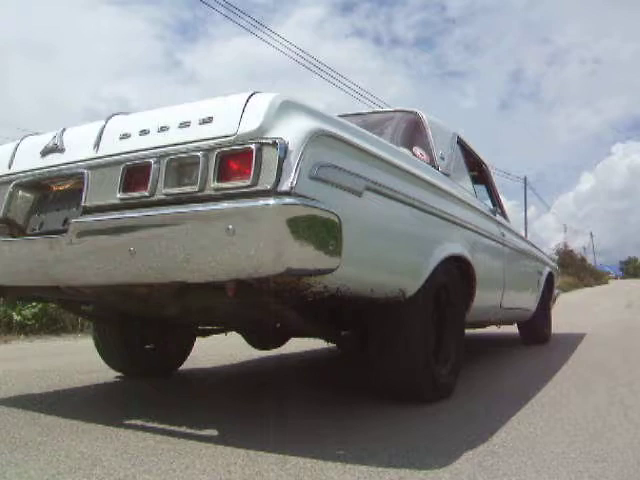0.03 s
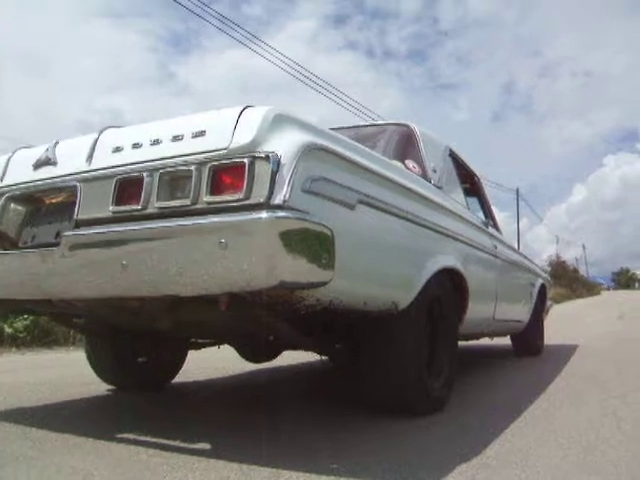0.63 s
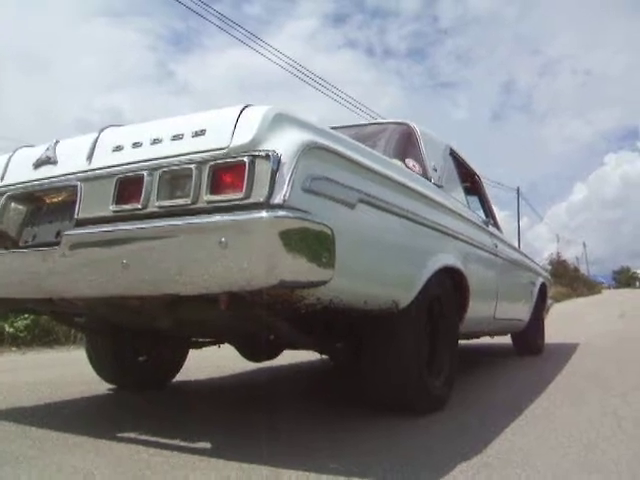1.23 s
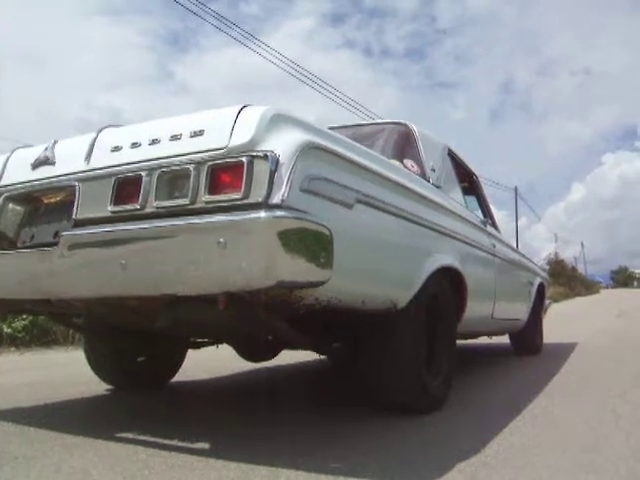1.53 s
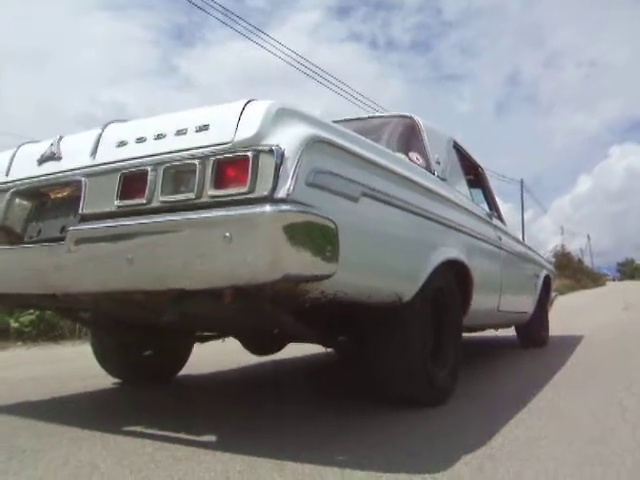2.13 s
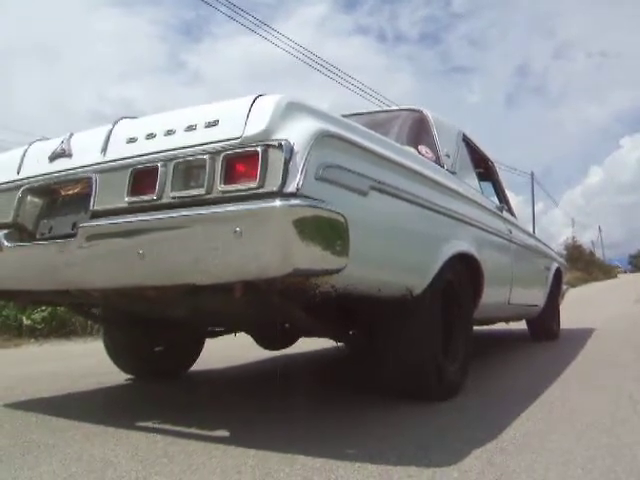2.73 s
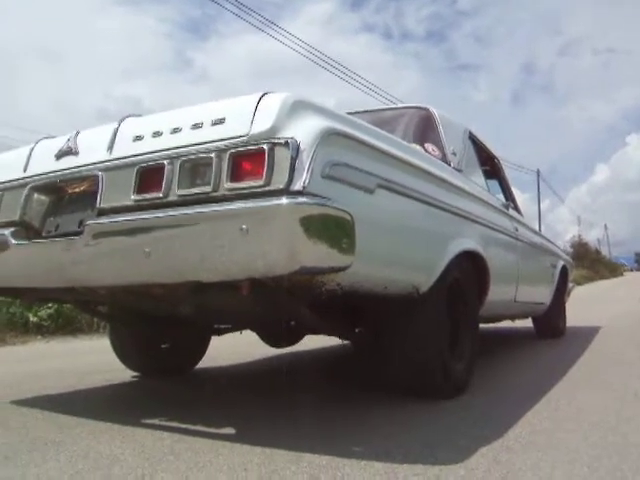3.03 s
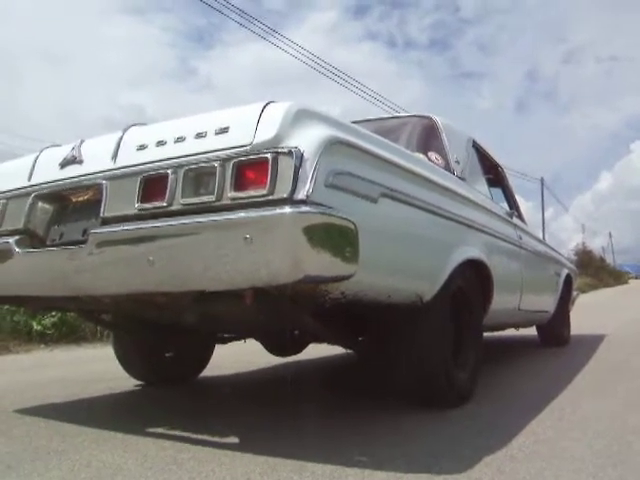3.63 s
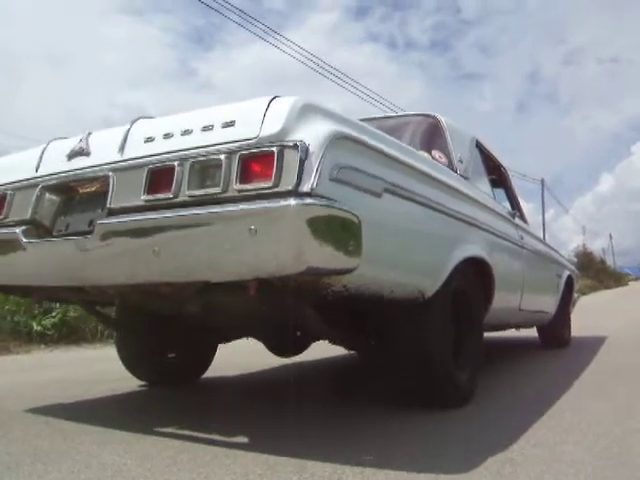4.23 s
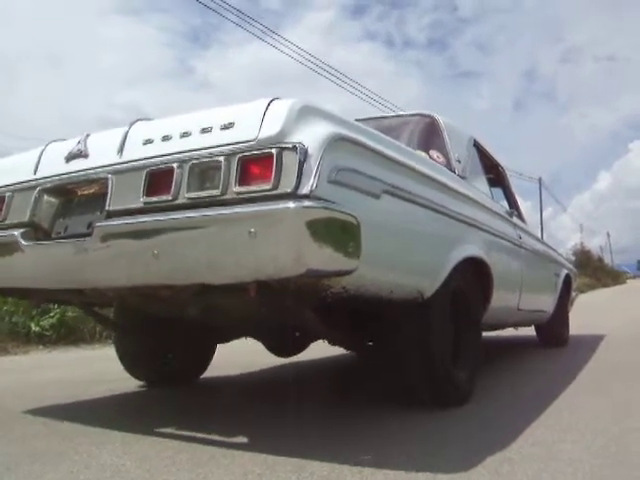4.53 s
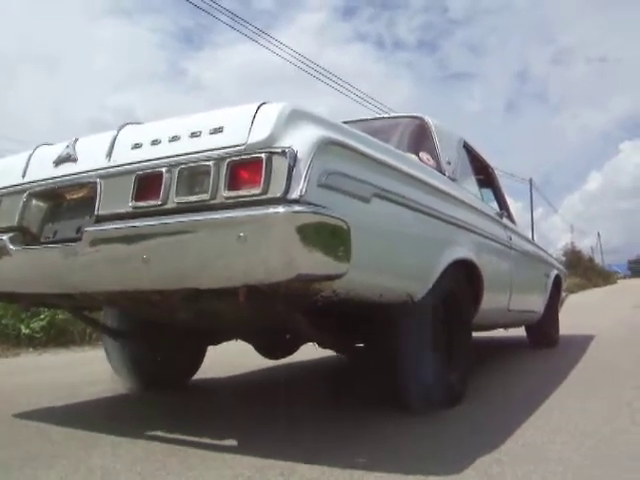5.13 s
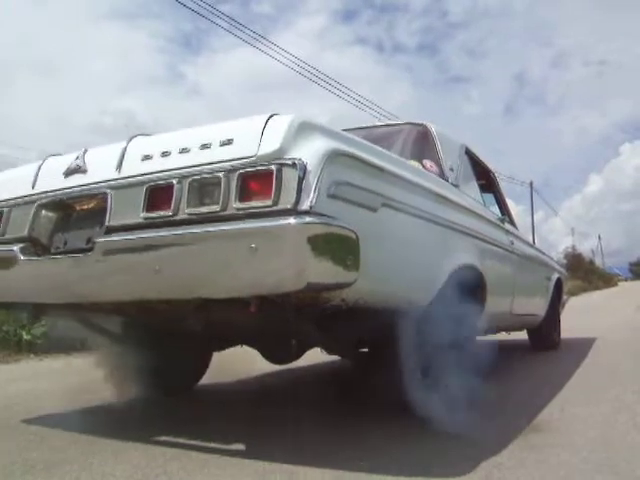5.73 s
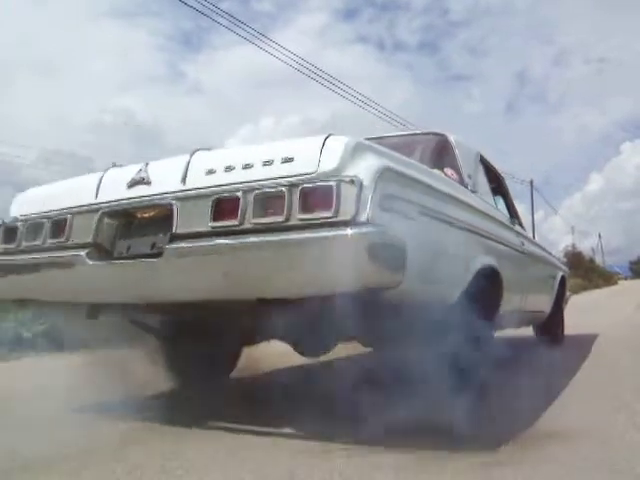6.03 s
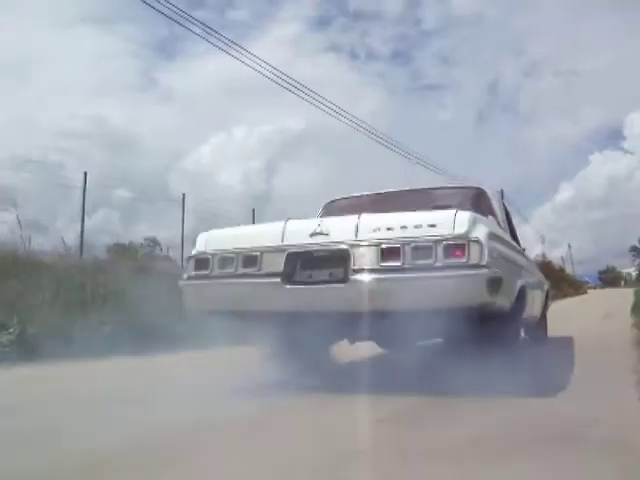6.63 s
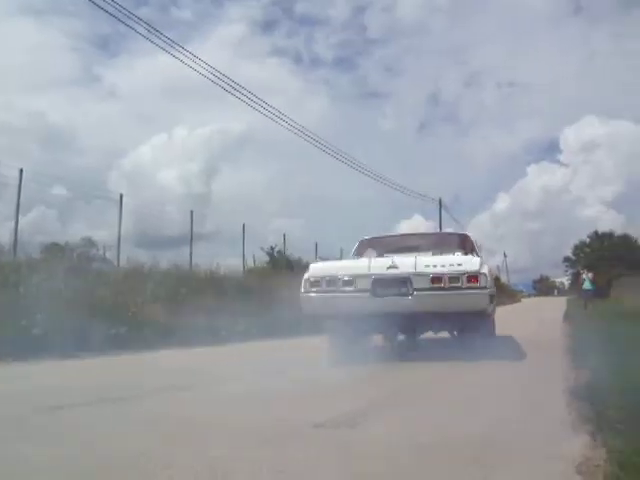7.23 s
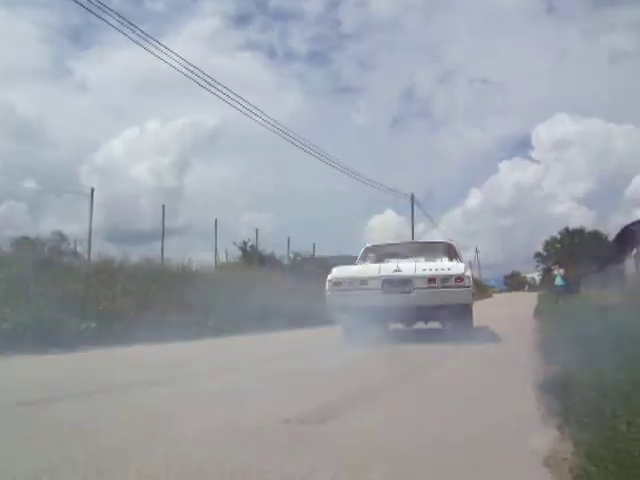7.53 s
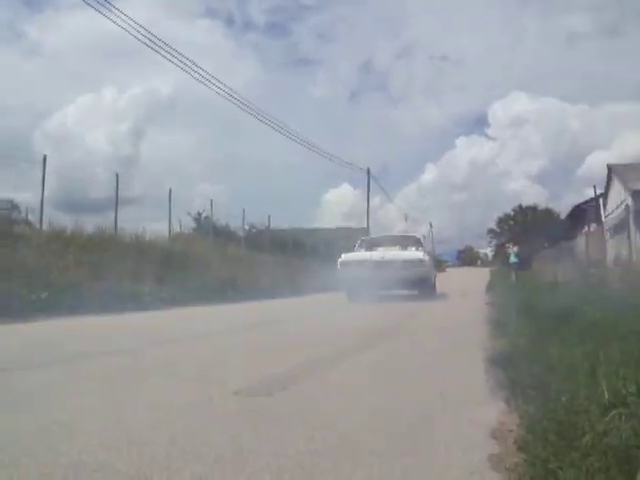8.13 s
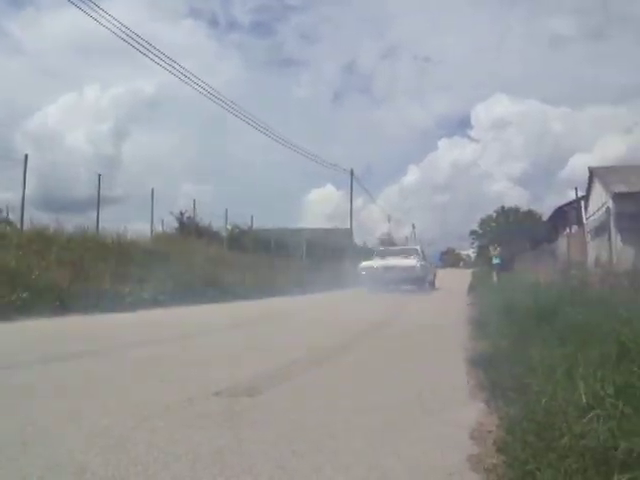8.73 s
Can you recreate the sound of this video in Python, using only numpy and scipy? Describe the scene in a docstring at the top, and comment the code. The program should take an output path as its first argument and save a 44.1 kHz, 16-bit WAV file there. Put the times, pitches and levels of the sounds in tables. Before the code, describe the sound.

A lumpy car engine idle climbs to a roar, with a long tyre squeal and exhaust cracks as it pulls away.

```python
"""A V8 engine lopes at idle near a low camera, then revs against the brake until the rear tyres spin.
Its uneven firings ring the exhaust pipe, with chuffs, valve ticks, chirps, hiss and one dry snap.
The tyres scrub on the asphalt and squeal by stick-slip oscillation while the car pulls away.
At high revs the exhaust merges into a harmonic drone; as the tailpipes swing towards the
microphone, the strongest pulses, steepened into shocks, arrive as sharp cracks."""
import sys
import numpy as np
from scipy import signal
from scipy.fft import rfft, irfft, next_fast_len
from scipy.io import wavfile
from scipy.ndimage import uniform_filter1d

SR = 44100
rng = np.random.default_rng(int(sys.argv[2]) if len(sys.argv) > 2 else 0)


def wav_record(signal):
    """Record a signal, one row per channel, as 16-bit PCM in the file named by sys.argv[1]."""
    frames = np.transpose(np.atleast_2d(signal))
    bounded = np.clip(frames, -1, 1)
    # unit amplitude maps onto the largest positive 16-bit level
    quanta = np.round(bounded * 32767).astype(np.int16)
    wavfile.write(sys.argv[1], SR, quanta)


N = 387198
T = np.arange(N) / SR

# base level of the exhaust: time_s, level_db
EXHAUST_LEVEL = [(1.9, -23.5), (2.1, -20.5), (4.4, -19), (4.6, -26), (4.8, -24), (5.12, -24.5),
                 (5.34, -28.5), (5.55, -22), (6.1, -23.5), (6.7, -28), (7.2, -29), (8.0, -31), (8.78, -29)]
# crank speeds (from, fully) over which the throttle opens, the throb dies and the tyres spin
THROTTLE_RPM, THROB_END_RPM, SPIN_RPM = (625, 675), (1290, 1710), (1510, 1970)
AWAY_S = (5.54, 9.4)  # the car goes from beside the microphone to far up the road


def amp(db):
    """Decibels to amplitude ratio."""
    return 10 ** (np.asarray(db) / 20)


def unit(x):
    """Normalisation to rms 1."""
    return x / np.sqrt(np.mean(x ** 2) + 1e-20)


def steady(x):
    """Division by the running rms: the slow level stays at 1 and the beat within it remains."""
    return x / np.sqrt(abs(uniform_filter1d(x ** 2, size=9000)) + 1e-9)


def curves(rows):
    """Linear interpolation of each column of a timed table to every sample."""
    time_s, *columns = np.transpose(rows)
    return [np.interp(T, time_s, column) for column in columns]


def ramp(x, ends):
    """Linear rise from 0 to 1 as x passes between two values."""
    return np.clip((x - ends[0]) / (ends[1] - ends[0]), 0, 1)


def swell(centre_s, half_s):
    """Gaussian envelope of height 1."""
    return np.exp(-((T - centre_s) / half_s) ** 2)


def wander(hz):
    """Random modulation of rms 1: noise low-passed at hz."""
    size = next_fast_len(N, True)
    f = np.fft.rfftfreq(size, 1 / SR)
    return unit(irfft(rfft(rng.standard_normal(size)) / (1 + (f / hz) ** 4), size)[:N])


def jittered_phase(hz, jitter, rate_hz):
    """Phase of a tone under random frequency modulation; jitter is the rms share of its pitch."""
    return 2 * np.pi * np.cumsum(hz * (1 + jitter * wander(rate_hz))) / SR


def response(spectrum, size=8192):
    """Minimum-phase impulse response for rows of frequency_hz, gain_db."""
    hz, db = np.transpose(spectrum)
    f = abs(np.fft.fftfreq(size, 1 / SR))
    log_gain = np.log(amp(np.interp(np.log(f + 1), np.log(hz), db)))
    return np.fft.ifft(np.exp(np.conj(signal.hilbert(log_gain)))).real[:size // 2]


def colour(x, spectrum):
    """Spectral shaping by convolution, to rms 1."""
    return unit(signal.oaconvolve(x, response(spectrum))[:N])


def resonate(x, hz, *widths_hz):
    """Resonators in series, one for each bandwidth, whose centre follows hz."""
    turn = np.exp(2j * np.pi * np.cumsum(hz * np.ones(N)) / SR)
    for width_hz in widths_hz:
        pole = np.exp(-np.pi * width_hz / SR)
        x = 2 * (turn * signal.lfilter([1 - pole], [1, -pole], x / turn)).real
    return x


def decay(x, seconds):
    """Leaky integration: each impulse gains an exponential tail."""
    return signal.lfilter([1], [1, -np.exp(-1 / (seconds * SR))], x)


def crank(rpm):
    """Four-stroke timing: cycles (two revolutions each), the sample of every firing and its cylinder."""
    cycles = np.cumsum(rpm) / (120 * SR)
    stroke = np.floor(8 * cycles).astype(int)
    firings = np.flatnonzero(np.diff(stroke)) + 1
    return cycles, firings, stroke[firings] % 8


def exhaust(rpm, cycles, firings, cylinder):
    """Source and filter: uneven firings ring the pipe and puff gas over a throb at the firing rate."""
    # the eight cylinders in firing order, at slow idle and with the throttle open: strength_db
    idle_db = [0, -2.5, 4, -5, -1, -40, -11, -1]
    open_db = [-25, -2, 0.5, -8.5, -10.5, -3.5, 3, -23]
    # load against the brake, which makes the firings ragged: speed_rpm, strain_share
    brake_load = [(800, 0.06), (1200, 0.74), (2700, 0.9), (3100, 0.03)]
    # spectra of the pipe's boom, its bark under load and the gas noise: frequency_hz, gain_db
    pipe_spectrum = [(20, -51), (35, -20), (65, -10), (95, -12.5), (118, 0.5), (135, 14), (155, -1),
                     (180, -5.5), (240, -19.5), (330, -32.5), (480, -32), (800, -63), (2000, -59.5)]
    bark_spectrum = [(50, -11.5), (110, -8), (170, 2.5), (210, -1), (290, -14.5), (380, -14.5), (470, -19),
                     (600, -30.5), (1200, -39.5)]
    rasp_spectrum = [(30, -3.5), (100, 1), (240, 0), (400, -0.5), (600, -8), (800, -7), (1050, -11.5),
                     (1400, -16), (3000, -21)]
    level_db, throttle = curves(EXHAUST_LEVEL)[0], ramp(rpm[firings], THROTTLE_RPM)
    strain = np.interp(rpm, *np.transpose(brake_load))
    clean, throb_gone = ramp(rpm, (1750, 2150)), ramp(rpm, THROB_END_RPM)

    strength_db = (1 - throttle) * np.take(idle_db, cylinder) + throttle * np.take(open_db, cylinder)
    scatter_db = 1.5 + 3.8 * strain[firings] * (1 - .6 * ramp(rpm[firings], SPIN_RPM))
    pulses = np.zeros(N)
    pulses[firings] = amp(strength_db + scatter_db * rng.standard_normal(len(firings)))
    boom = steady(colour(pulses, pipe_spectrum)) * amp(level_db - 1.5 - 18.5 * clean)
    bark = steady(colour(pulses, bark_spectrum)) * strain * amp(-25.5 - 18.5 * ramp(rpm, (1400, 2400)))
    thuds = steady(resonate(pulses - uniform_filter1d(pulses, size=2200), 45, 45))
    thuds *= strain * amp(-26 - throb_gone) * (1 - clean)

    firing_phase, firing_hz = 2 * np.pi * 8 * cycles, rpm / 15
    throb = np.cos(firing_phase)
    for k in (2, 3):
        lift = .058 + .5 * np.exp(-((k * firing_hz - 110) / 22) ** 2)  # near the pipe's resonance
        throb += lift * np.cos(k * firing_phase)
    waver_db = (2.5 + 3.7 * strain) * wander(35)
    throb *= amp(level_db + 1.7 - 6.5 * strain + waver_db) * (1 - throb_gone)

    puffs = steady(decay(np.sqrt(pulses), seconds=.02)) + 2
    rasp = steady(colour(puffs * rng.standard_normal(N), rasp_spectrum))
    rasp *= amp(-35 + 6 * strain - 3.5 * clean - 10 * ramp(T, AWAY_S))
    return boom + bark + thuds + throb + rasp


def chuffs(rpm):
    """Cavity resonance: puffs sound two hollow modes of the silencer; at fast idle a lower one hums."""
    # loose puffs of the idling exhaust: time_s, relative_db
    idle_puffs = [(0.157, -27), (0.368, -25), (0.563, -32), (0.656, -26.5), (0.785, -28), (0.864, -32),
                  (1.008, -31), (1.27, -22), (1.397, -23), (1.603, -23.5), (1.731, -22), (1.808, -19)]
    throttle = ramp(rpm, THROTTLE_RPM)
    puffs = sum(amp(db) * swell(s + .015, half_s=.019) for s, db in idle_puffs)
    puffs += amp(-35) * (1 - throttle)
    gas = rng.standard_normal(N)
    hollow = np.sin(jittered_phase(500, jitter=.0684, rate_hz=90))
    hollow += .52 * np.sin(jittered_phase(415, jitter=.05, rate_hz=60))
    hum = unit(resonate(gas, 341, 60, 60)) * throttle * (1 - ramp(rpm, THROB_END_RPM))
    return amp(-8.5) * puffs * unit(hollow) + amp(-43) * hum


def engine_bay(rpm, firings):
    """Impact and flow noise: valve gear ticks unevenly at low revs; the fan whirrs in a narrow band."""
    taps, throttle = np.zeros(N), ramp(rpm, THROTTLE_RPM)
    taps[firings] = amp(5.5 * rng.standard_normal(len(firings)))
    tick_hz = 4000 + 800 * throttle + 200 * wander(13)
    bursts = steady(decay(taps, seconds=.0082)) * rng.standard_normal(N)
    ticks = unit(resonate(bursts, tick_hz, 1000, 1300)) * (1 - ramp(rpm, (760, 1100)))
    whirr = unit(resonate(resonate(rng.standard_normal(N), 1035, 200), 1074, 200))
    return amp(-50.5 + 6 * throttle) * ticks + amp(-47.5 + 2.8 * throttle) * whirr


def scrub_and_hiss(rpm, cycles):
    """Modulated noise: grainy friction of rubber on asphalt; engine hiss fluttering with the crank."""
    # spectra of the tyre scrub and the engine hiss: frequency_hz, gain_db
    scrub_spectrum = [(200, -17), (600, -3), (1100, -5), (1300, -1.5), (1800, -3), (2400, -4), (3200, -7.5),
                      (5000, -8.5), (8000, -14)]
    hiss_spectrum = [(1000, -28), (3000, -16.5), (4000, -7), (4700, -5), (5600, -2.5), (6200, 3), (6600, 2),
                     (7100, 4.5), (7600, -1.5), (8200, 0.5)]
    # brief surges of rushing air and grit: centre_s, half_length_s, boost_db
    air_surges = [(1.382, 0.36, 2.5), (1.963, 0.22, 5.5), (3.926, 0.016, 8.5), (4.15, 0.16, 2),
                  (5.648, 0.34, 2)]
    spin = ramp(rpm, SPIN_RPM)
    surge_db = sum(db * swell(s, half_s) for s, half_s, db in air_surges)
    scrub = colour(rng.standard_normal(N) * amp(2.3 * wander(700)), scrub_spectrum)
    scrub_db = -40 + 11.5 * spin - 4 * ramp(T, AWAY_S) + surge_db + wander(11)
    flutter_db = .7 * np.cos(2 * np.pi * 2 * cycles) + wander(40)
    hiss = colour(rng.standard_normal(N) * amp(2.46 * wander(340)), hiss_spectrum)
    hiss_db = -33.5 + 3 * ramp(rpm, THROTTLE_RPM) - spin - 12.5 * ramp(T, (7.1, 8.9)) + surge_db
    return scrub * amp(scrub_db) + hiss * amp(hiss_db + flutter_db)


def chirps(rpm, firings):
    """Phase-modulated tone bursts: metallic chirps at idle, some clear, some faint on chance firings."""
    # the clear chirps: centre_s, pitch_hz, level_db
    clear_chirps = [(.21, 3750, -44), (.28, 4150, -40), (.41, 4100, -37), (.83, 4140, -42),
                    (1.04, 4440, -35), (1.11, 4100, -47), (1.44, 4900, -34), (1.88, 4850, -33),
                    (1.93, 4900, -35), (1.97, 7150, -33), (2.09, 7170, -30), (2.14, 7150, -35),
                    (2.31, 7230, -33), (2.37, 4170, -39), (2.81, 7050, -34.5), (3.27, 5000, -38),
                    (3.46, 6850, -32.5), (3.77, 6550, -33)]
    half_s, faint_share = .009, .3
    idle = firings[rpm[firings] < 850]
    chosen = rng.random(len(idle)) < faint_share
    pitch_scatter, level_scatter = rng.standard_normal((len(idle), 2)).T
    pitch_hz = 4000 + 750 * ramp(rpm[idle], THROTTLE_RPM) + 330 * pitch_scatter
    faint_chirps = np.c_[idle / SR, pitch_hz, -43 + 2 * level_scatter][chosen]
    t = np.arange(-2 * half_s, 2 * half_s, 1 / SR)
    envelope = np.sqrt(2) * np.exp(-(t / half_s) ** 2)
    phase_noise, out = 1.1 * wander(250), np.zeros(N)
    for s, hz, db in [*clear_chirps, *faint_chirps]:
        span = np.clip(round(s * SR) - len(t) // 2 + np.arange(len(t)), 0, N - 1)
        out[span] += amp(db) * envelope * np.sin(2 * np.pi * hz * t + phase_noise[span])
    return out


def snap(start_s=.5375):
    """Impulse response: one click excites bright, quickly damped resonances, heard as a dry snap."""
    # resonances of the snap: frequency_hz, gain_db
    snap_spectrum = [(410, -35), (700, -24), (1340, -11), (2030, -15), (2280, -7.5), (2900, -11),
                     (3610, 2.5), (4790, -22), (6970, -34), (7660, -3), (8500, -10), (11000, -59),
                     (18700, -120)]
    click = np.zeros(N)
    click[round(start_s * SR)] = 1
    ring = signal.oaconvolve(click, response(snap_spectrum))[:N] + 2.4 * resonate(click, 3610, 170)
    return amp(-2) * ring / abs(ring).max()


def squeal(rpm):
    """Stick-slip oscillation: two tyres sing at different pitches; sliding smears the tone into noise."""
    # course of the squeal: time_s, level_db, higher_tyre_share, roughness_share, overtone_db
    squeal_course = [(4.55, -16.5, 0, 0.03, -20), (4.75, -18.5, 0.05, .04, -14),
                     (5.1, -20.5, 0.02, 0.2, -12.5), (5.35, -20.5, .1, .5, -17),
                     (5.7, -23.5, 0.2, 0.5, -19), (6.2, -20.5, 0, 0.28, -12.5),
                     (6.6, -18.5, 0.05, 0.2, -14.5), (6.95, -18.5, 0.51, .14, -14.5),
                     (7.5, -18, 0.82, .08, -20), (7.88, -21.5, 0.3, .18, -7.5),
                     (8.1, -25.5, 0.09, .2, -13.5), (8.78, -34.5, .05, 0.27, -23.5)]
    # note of the lower tyre: time_s, pitch_hz
    lower_pitch = [(4.46, 852), (4.58, 847), (4.65, 872), (4.69, 822), (4.77, 816), (4.87, 856),
                   (4.95, 820), (5.09, 860), (5.2, 802), (5.42, 848), (5.72, 865), (6.04, 826), (6.12, 852),
                   (6.2, 814), (6.6, 827), (6.95, 794), (7.5, 804), (7.88, 778), (8.1, 812), (8.78, 869)]
    # spans in which the rubber bites and sings: start_s, end_s
    bite_spans = [(4.45, 4.58), (4.652, 8.8)]
    # rubber sliding without biting, relative to the squeal: speed_rpm, relative_db
    slide_levels = [(1050, -72), (1240, -18), (1550, -10.5), (1900, -3.5)]
    level_db, high_share, rough, overtone_db = curves(squeal_course)
    unrest, edge_s = np.sqrt(rough), .0083
    bite = sum(ramp(T, (start, start + edge_s)) - ramp(T, (end, end + edge_s))
               for start, end in bite_spans)
    low_hz = curves(lower_pitch)[0]
    high_hz = 1.104 * low_hz
    rolloff = np.interp(T, [5.2, 6.3], [.8, .15])  # hot rubber loses its upper overtones
    tone = np.zeros(N)
    for hz, power in [(low_hz, 1 - high_share), (high_hz, high_share)]:
        drifting_hz = hz * (1 + .04 * rough * wander(20))
        phase = jittered_phase(drifting_hz, jitter=.045 * unrest, rate_hz=80)
        overtones = np.sin(2 * phase) + rolloff * np.sin(3 * phase) + rolloff ** 2 * np.sin(4 * phase) / 2
        gain = np.sqrt(power) * amp(4 * unrest * wander(63))
        tone += gain * (np.sin(phase) + amp(overtone_db + 7 * unrest * wander(21)) * overtones)

    smear_hz = low_hz + np.maximum(high_share, .32 * (1 - bite)) * (high_hz - low_hz)
    smear_hz += 30 * rough  # rougher sliding pushes the smear above the tone
    smear = unit(resonate(rng.standard_normal(N), smear_hz, 300, 330, 360))
    octave = unit(resonate(rng.standard_normal(N), 2 * smear_hz, 260, 300))
    singing = np.sqrt(1 - rough) * unit(tone) + unrest * (smear + amp(-12.5) * octave)
    sliding = smear * amp(np.interp(rpm, *np.transpose(slide_levels)))
    return (bite * singing + (1 - bite) * sliding) * amp(level_db)


def tread_chatter():
    """Roughness by random modulation: chattering tread screams above the squeal and groans below it."""
    # the gliding scream: time_s, pitch_hz, level_db
    scream_course = [(4.1, 998, -72), (4.17, 1000, -36), (4.56, 945.7, -41), (4.62, 990, -32),
                     (4.69, 930, -30), (4.86, 921, -30), (5.0, 1010, -35.5), (5.14, 1049, -25.5),
                     (5.2, 976, -35), (5.45, 984, -32.5), (5.7, 1051, -32), (5.85, 970, -27.5),
                     (6.0, 951, -26.5), (6.4, 960, -34.5), (6.8, 1000, -40), (8.78, 1078, -48)]
    # the groan: time_s, level_db
    groan_level = [(4.1, -73), (4.17, -38.5), (4.5, -41), (4.63, -31.5), (4.8, -39), (5.1, -35),
                   (5.18, -27), (5.32, -32), (5.55, -33), (5.8, -36), (6.2, -32.5), (6.45, -37),
                   (6.6, -36.5), (7.9, -38), (8.3, -54)]
    scream_hz, scream_db = curves(scream_course)
    phase = jittered_phase(scream_hz, jitter=.04, rate_hz=90)
    scream = unit((np.sin(phase) + amp(-16) * np.sin(2 * phase)) * amp(3 * wander(70)))
    groan = unit(np.sin(jittered_phase(713, jitter=.04, rate_hz=60)) * amp(3 * wander(46)))
    return scream * amp(scream_db) + groan * amp(curves(groan_level)[0])


def drone(rpm, cycles):
    """Harmonics of the engine cycle: their balance shifts as the load lets go and the car draws away."""
    # multiples of the cycle rate: order, labouring_db, revving_free_db, far_behind_db
    engine_orders = [(1, -19, -14, -24), (2, -14, -13, -15.5), (3, -12, -15, -20.5), (4, -14.5, -7.5, -6.5),
                     (5, -15, -1.5, -9.5), (6, -8, -16, -17.5), (7, -12, -16.5, -25.5), (8, -4, -24.5, -2),
                     (9, -14.5, -18.5, -18.5), (10, -18.5, -25, -15.5), (11, -18, -24, -13),
                     (12, -18.5, -23.5, -17.5), (13, -19.5, -9.5, -10.5), (14, -18.5, -23.5, -14.5),
                     (15, -20, -19.5, -19.5), (16, -26.5, -20.5, -13), (17, -22, -21, -28),
                     (18, -29, -24, -19.5), (19, -31, -24.5, -25.5), (20, -26, -19, -30),
                     (21, -25.5, -31, -23.5), (22, -21, -22, -24.5)]
    # pipe resonances that lift the orders sweeping through them: centre_hz, half_width_hz, boost_db
    pipe_bands = [(251, 18, 8.5), (421, 16, 8.5)]
    coarse = slice(None, None, 100)  # the amplitudes change slowly
    free = ramp(rpm, (2340, 3240))[coarse]
    far = ramp(T, (6.3, 7.57))[coarse]  # the car draws away up the road
    cycle_hz, out = rpm[coarse] / 120, np.zeros(N)
    for order, labouring_db, free_db, far_db in engine_orders:
        pipe_db = sum(db * np.exp(-((order * cycle_hz - hz) / width) ** 2) for hz, width, db in pipe_bands)
        near = ((1 - free) * amp(labouring_db) + free * amp(free_db)) * amp(pipe_db)
        drift = uniform_filter1d(rng.standard_normal(len(far)), size=120)
        waver_db = unit(uniform_filter1d(drift, size=80))
        gain = ((1 - far) * near + far * amp(far_db)) * amp(waver_db)
        out += np.interp(T, T[coarse], gain) * np.cos(2 * np.pi * (order * cycles + rng.random()))
    return steady(out) * amp(curves(EXHAUST_LEVEL)[0]) * ramp(rpm, SPIN_RPM)


def cracks(firings, cylinder, lag_s=.0004):
    """Nonlinear steepening: each hard-firing cylinder sends one shock a cycle out of the tailpipes."""
    # runs of shocks that swell and fade: cylinder, centre_s, half_length_s, peak_db
    shock_runs = [("5", 5.58, 0.23, -7.5), ("1", 5.85, 0.31, -15), ("5", 6.05, .45, -13.5),
                  ("5", 6.3, 0.067, -9), ("1", 7.19, 0.34, -7), ("5", 7.54, 0.61, -9.5),
                  ("1", 7.88, 0.24, -1.2), ("6", 7.9, 0.21, -12), ("5", 9.1, 0.26, -13),
                  ("3", 8.02, 0.29, -10.5), ("1", 8.3, 0.14, -14), ("3", 8.52, 0.18, -11.5),
                  ("3", 8.78, 0.1, -12.5)]
    # spectra of a shock front, close by and thinner from afar: frequency_hz, gain_db
    near_spectrum = [(200, -20), (900, 2), (1800, 8), (3500, 6), (6000, 5.5), (8000, 4.5), (10000, -14)]
    far_spectrum = [(200, -24), (900, -6), (2100, 12.5), (3300, 4), (4600, 5), (6500, 2), (8000, -2.5),
                    (10000, -15)]
    clicks, out = np.zeros(N), np.zeros(N)
    for which, centre_s, half_s, peak_db in shock_runs:
        own = firings[cylinder == int(which)]
        clicks[own] += swell(centre_s, half_s)[own] * amp(peak_db + 1.1 * rng.standard_normal(len(own)))
    far = ramp(T, (8.05, 8.35))
    for spectrum, share in [(near_spectrum, 1 - far), (far_spectrum, far)]:
        front = np.r_[np.zeros(round(lag_s * SR)), response(spectrum)]
        out += signal.oaconvolve(clicks * share, front / abs(front).max())[:N]
    return out


def scene():
    """Superposition: engine and tyres add at one microphone, with the crank pacing the engine."""
    # speed of the crankshaft: time_s, speed_rpm
    crank_speed = [(0.0, 636.0), (0.6, 562.0), (1.0, 594.0), (1.88, 583.0), (2.1, 731.0), (3.25, 723.0),
                   (3.78, 850.0), (4.12, 1248.0), (4.3, 1216.0), (4.55, 1802.0), (5.3, 2879.0),
                   (5.45, 3241.0), (5.75, 3655.0), (6.1, 3717.0), (6.7, 3668.0), (7.05, 3579.0),
                   (7.7, 3497.0), (8.4, 3253.0), (8.78, 3092.0)]
    rpm = curves(crank_speed)[0]
    cycles, firings, cylinder = crank(rpm)
    tailpipes = exhaust(rpm, cycles, firings, cylinder) + drone(rpm, cycles) + cracks(firings, cylinder)
    idle_sounds = chuffs(rpm) + engine_bay(rpm, firings) + chirps(rpm, firings)
    tyres = squeal(rpm) + tread_chatter()
    return (tailpipes + idle_sounds + tyres + scrub_and_hiss(rpm, cycles) + snap())[None]


def record(dry):
    """Clipping and band limiting: after a quick fade-in, the small camera cuts tall peaks and treble."""
    overload, edge_hz = .75, 8200
    fade_in = np.interp(T, [.069, .075, .15], [.003, .45, 1])
    clipped = np.clip(dry * fade_in, -overload, overload)
    band_limit = signal.firwin(141, edge_hz, window=("kaiser", 8), fs=SR)
    return signal.oaconvolve(clipped, band_limit[None], "same")


dry = scene()
out = record(dry)
wav_record(out)
```